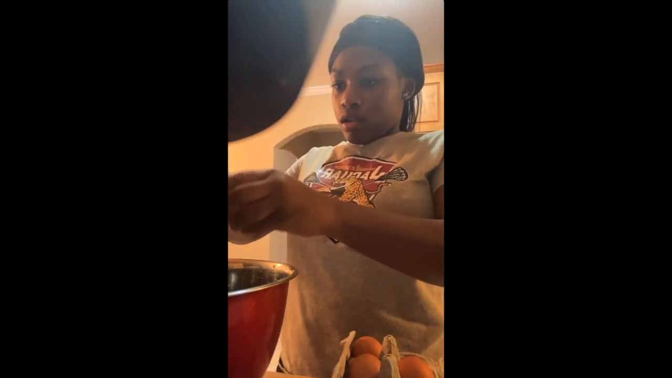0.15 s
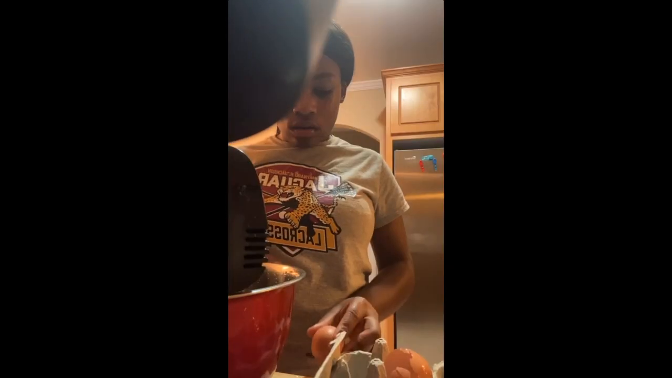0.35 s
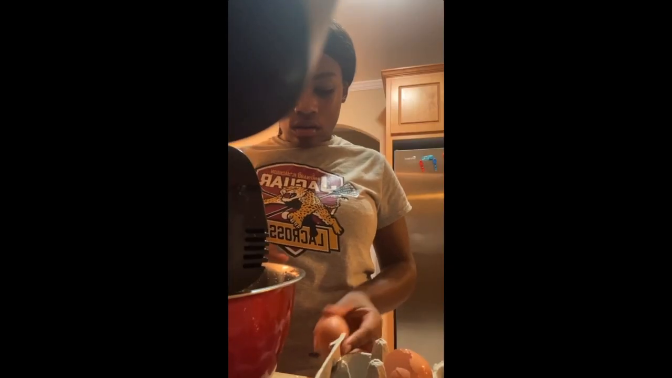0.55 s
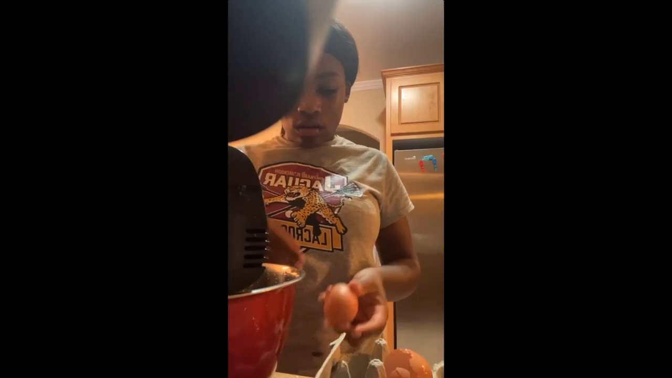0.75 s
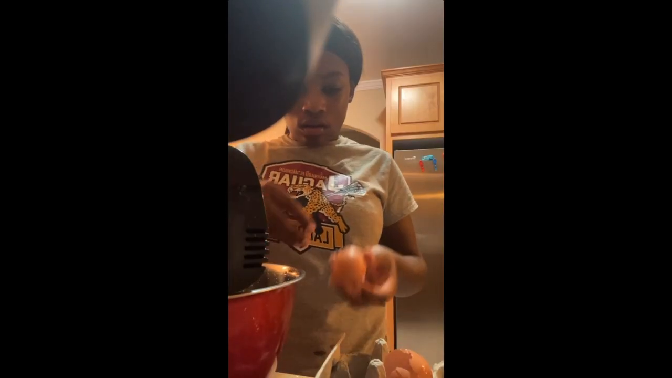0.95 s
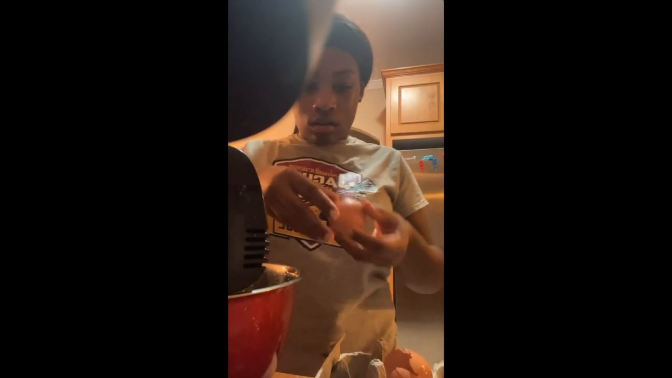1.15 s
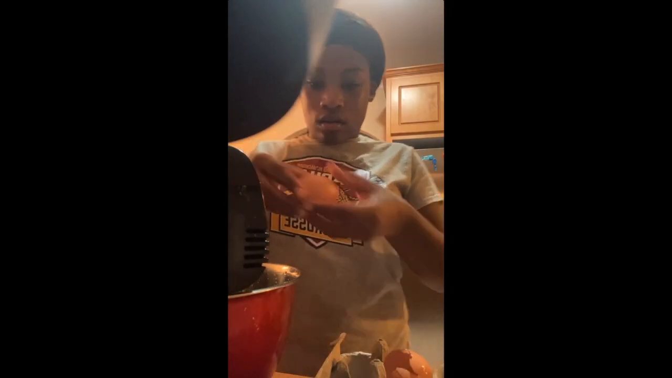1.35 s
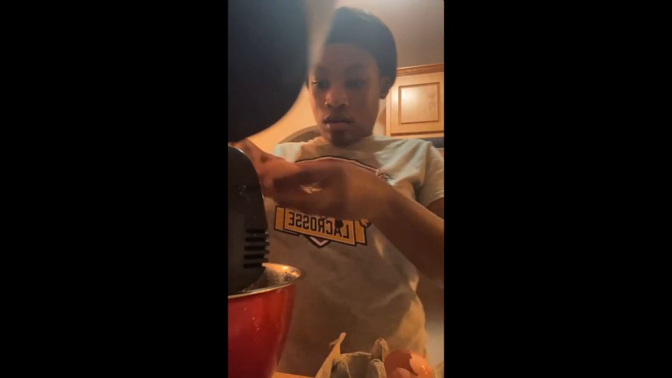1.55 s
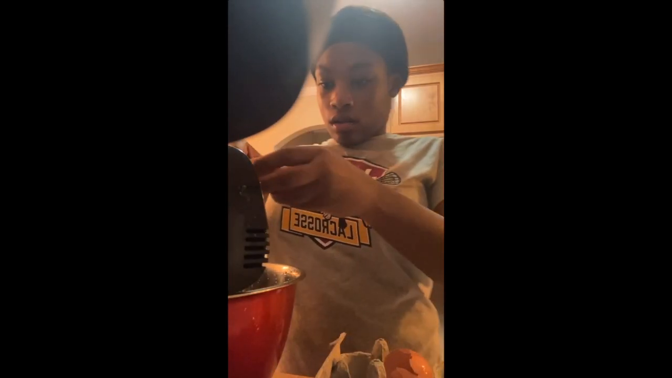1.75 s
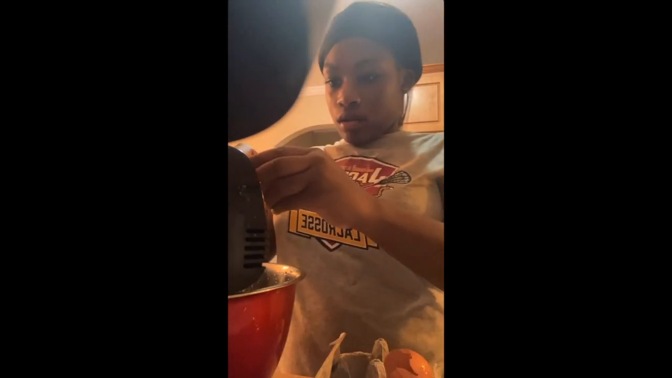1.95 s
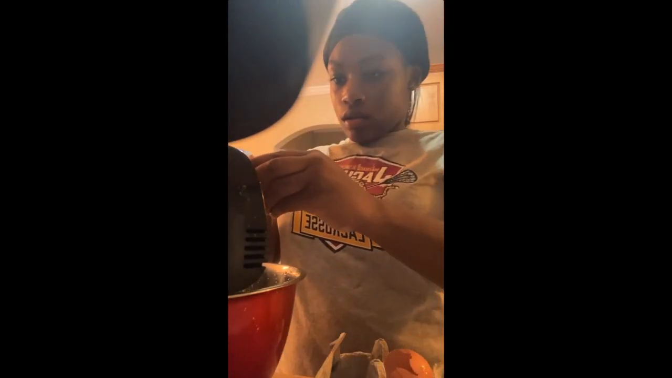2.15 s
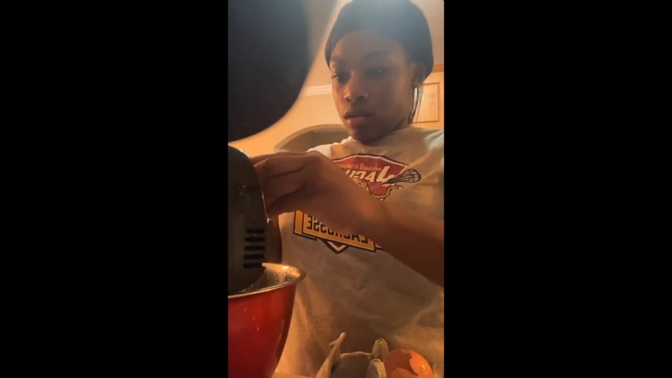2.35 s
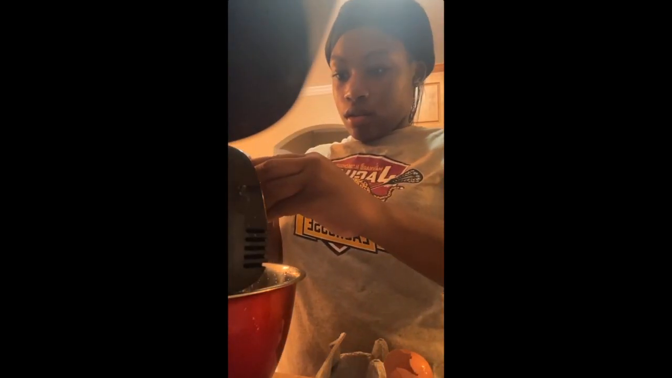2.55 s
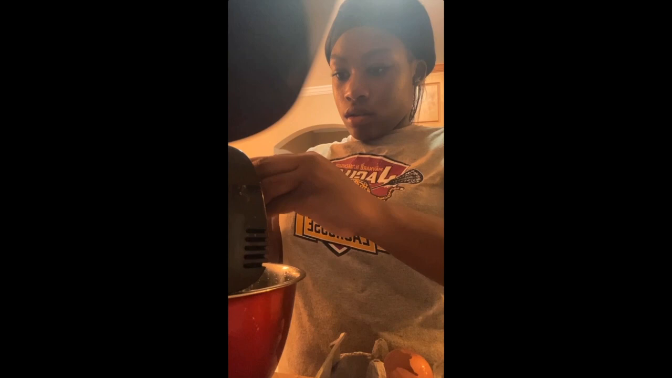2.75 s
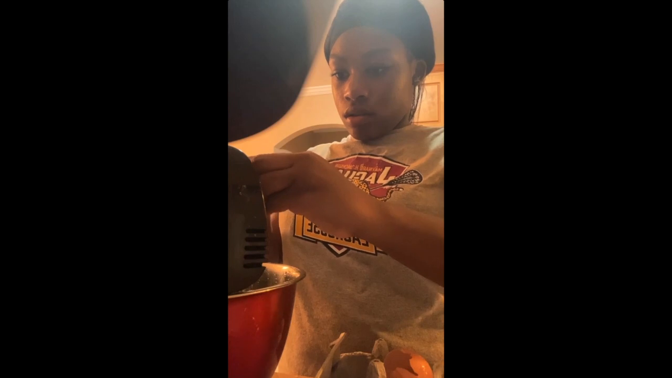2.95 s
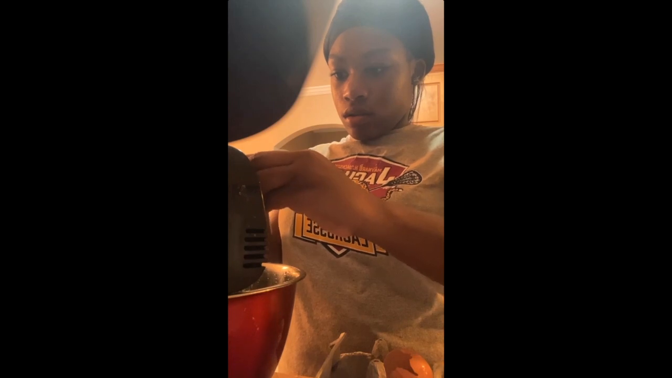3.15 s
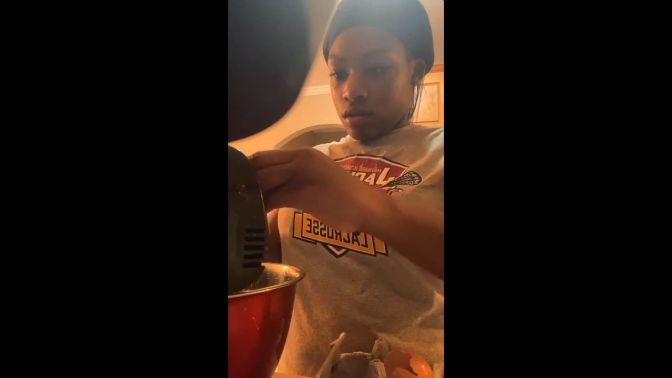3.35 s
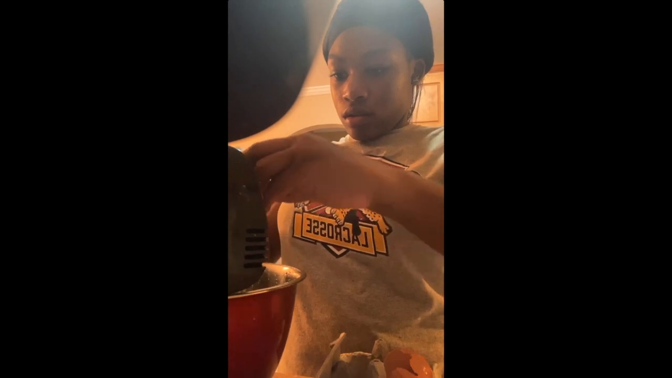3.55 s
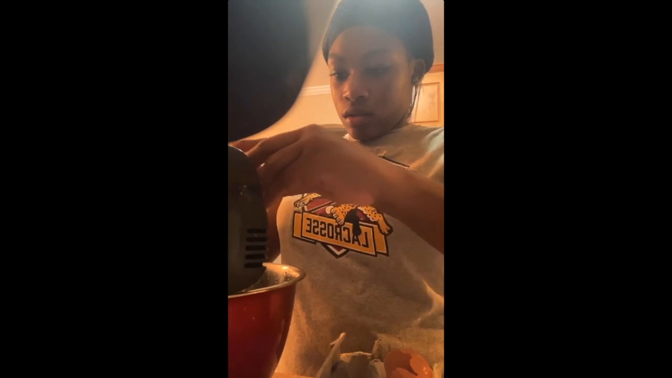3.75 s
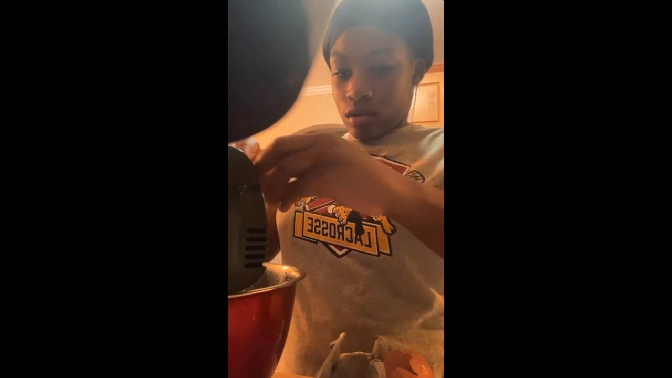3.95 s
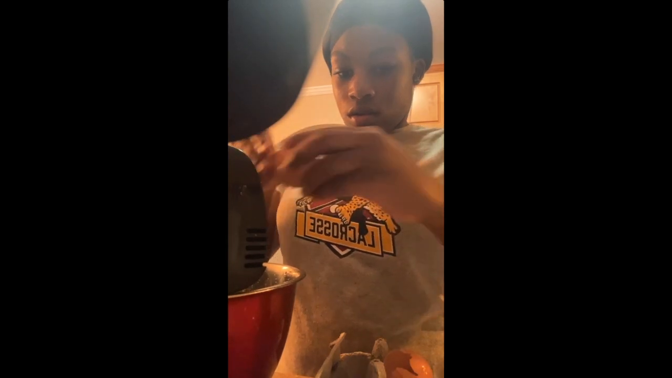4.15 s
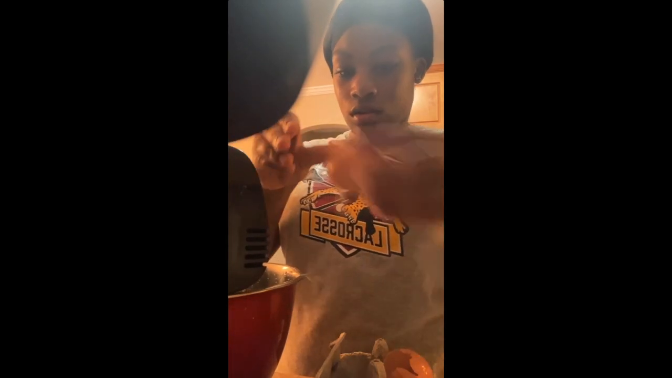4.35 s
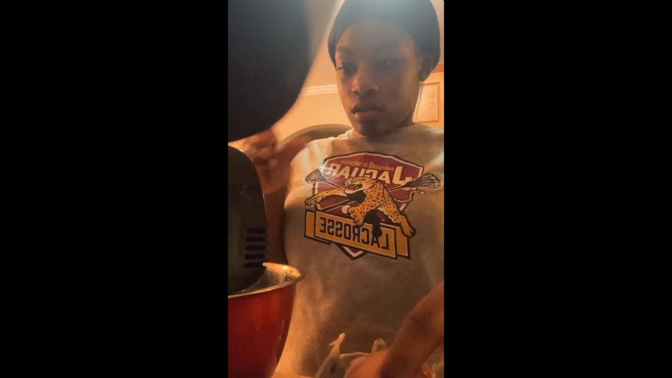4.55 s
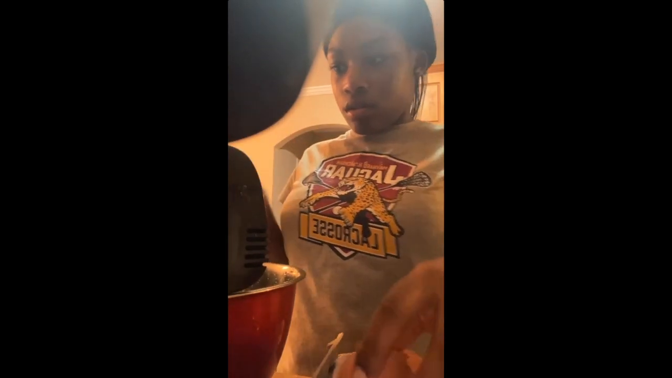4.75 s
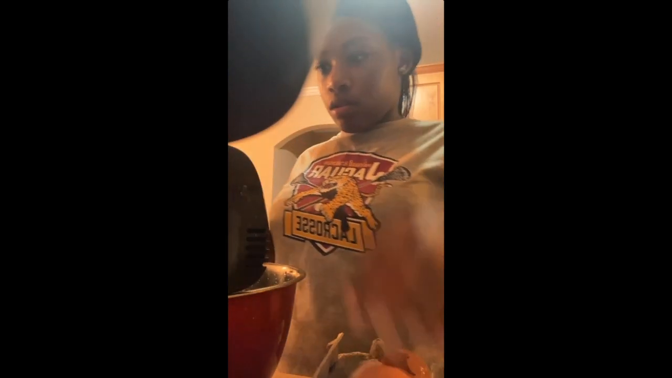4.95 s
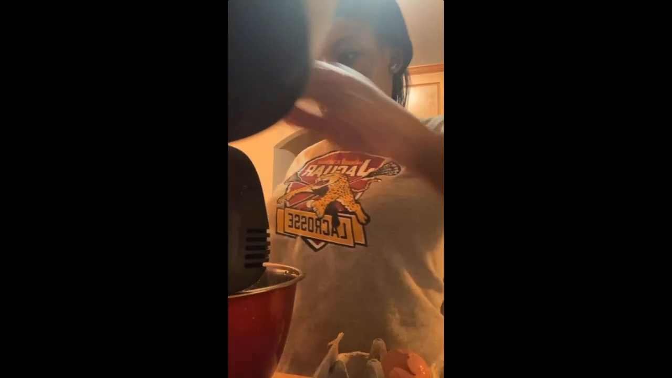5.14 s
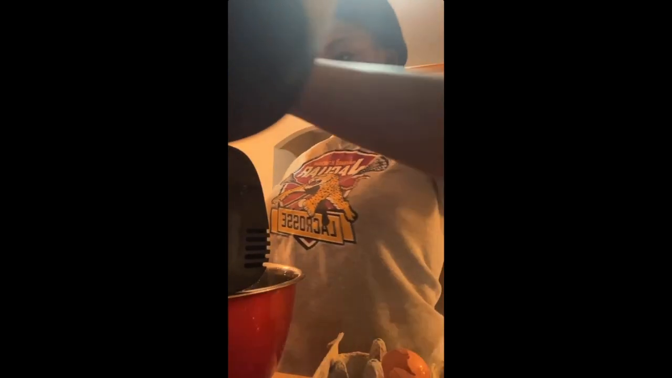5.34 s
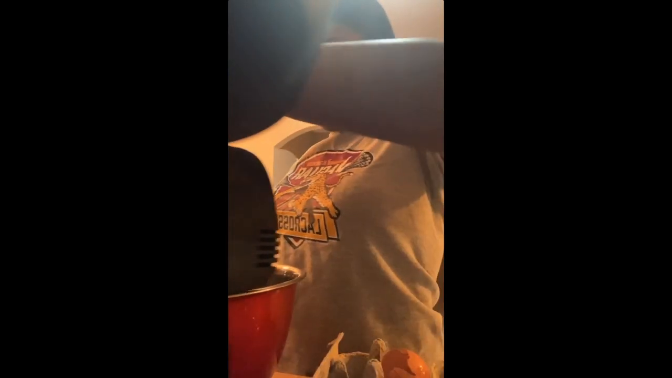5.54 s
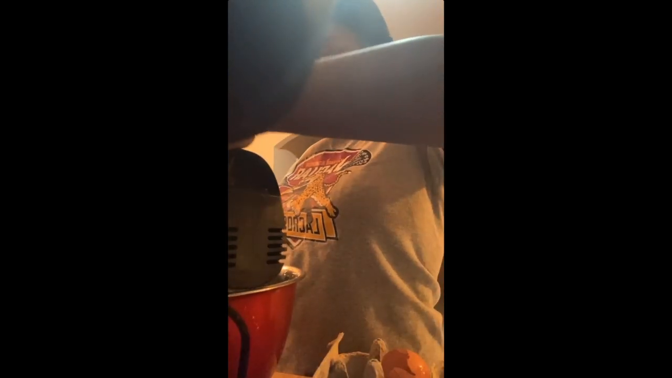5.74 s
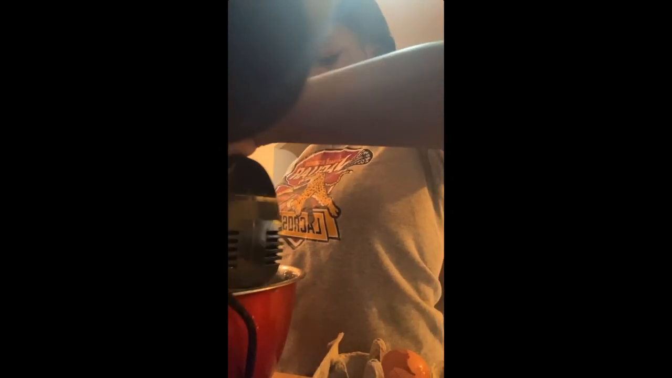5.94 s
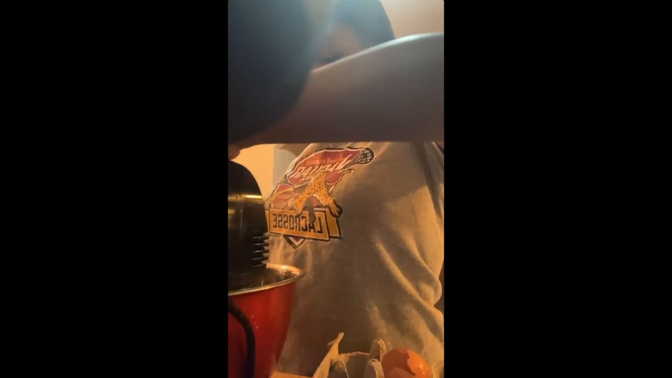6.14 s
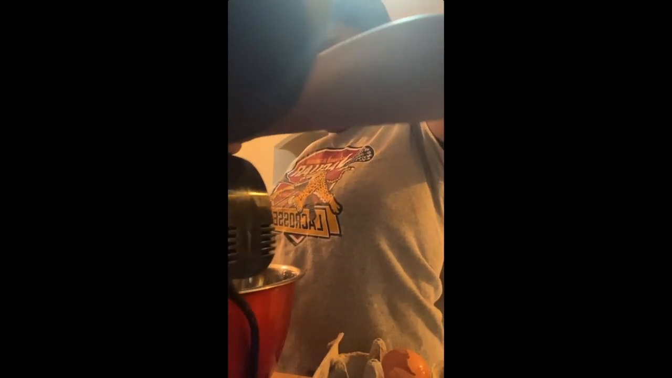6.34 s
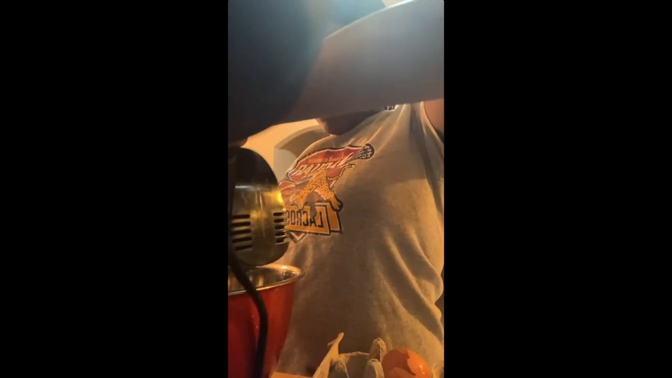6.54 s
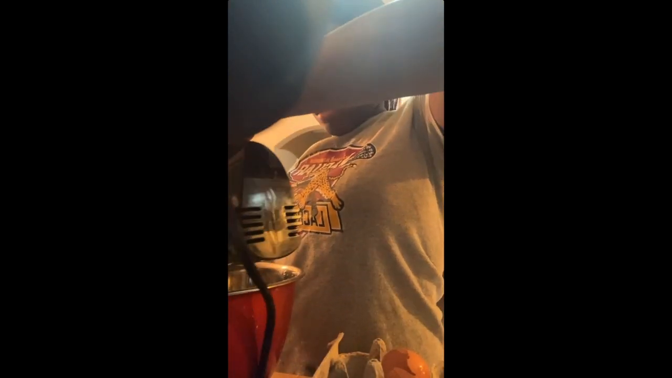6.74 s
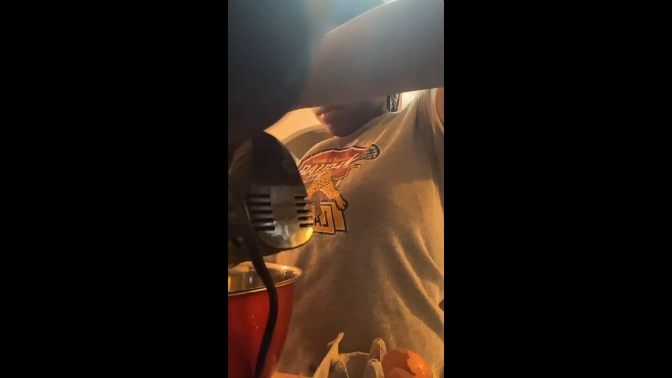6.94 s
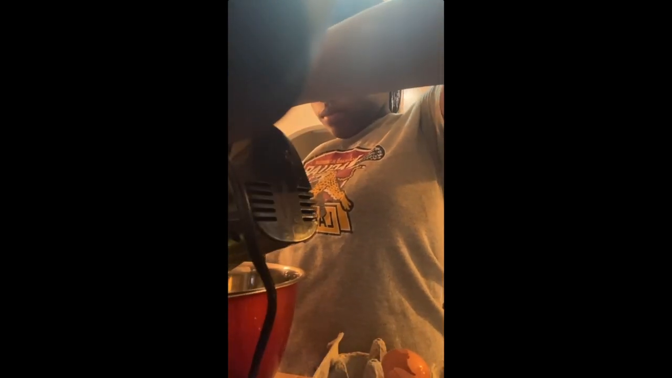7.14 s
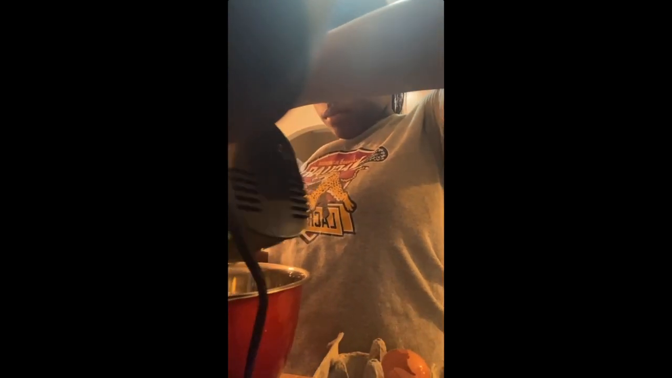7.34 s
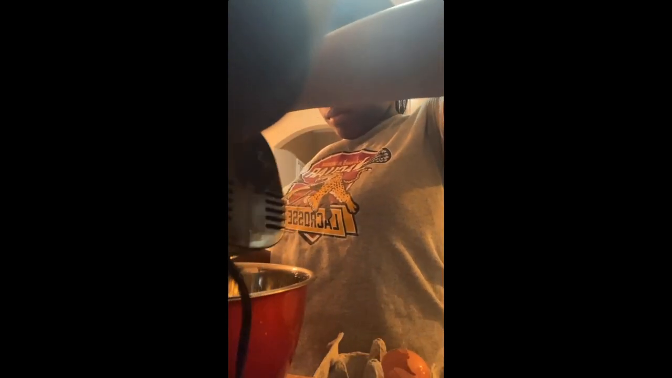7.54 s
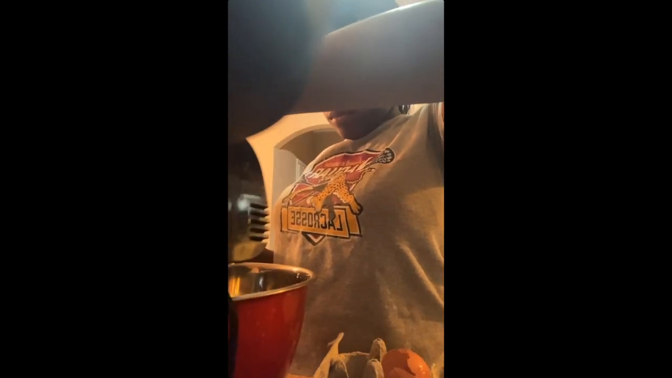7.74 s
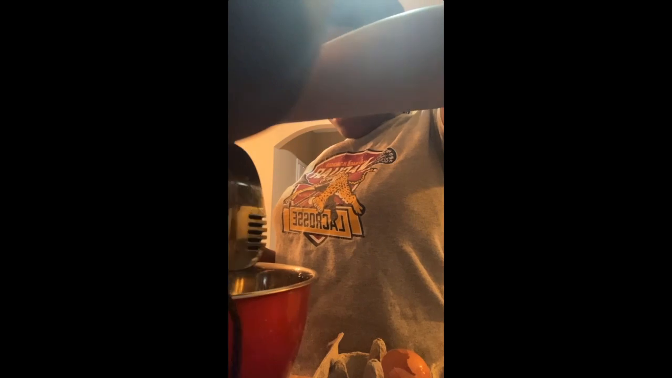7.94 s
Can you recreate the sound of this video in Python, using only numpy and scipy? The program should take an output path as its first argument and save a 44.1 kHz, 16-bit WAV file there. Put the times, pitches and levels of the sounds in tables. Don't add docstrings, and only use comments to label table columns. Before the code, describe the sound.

First, sparse delicate sounds near the microphone: fingers on shell and carton, brittle cracking, a small bowl ring, then a hard tap on something solid and low counter bumps. A fridge hums faintly beneath. Then an electric mixer switches on, its whine climbing quickly to a steady high whir, with airy hiss, churning batter and quick uneven hollow knocks of blades on the bowl in a short-echo kitchen.

```python
import sys
import numpy as np
from scipy import signal
from scipy.fft import rfft, irfft, next_fast_len
from scipy.io import wavfile
from scipy.ndimage import uniform_filter1d, minimum_filter1d

SR = 44100
rng = np.random.default_rng(int(sys.argv[2]) if len(sys.argv) > 2 else 0)


def waveform_to_disk(signal):
    frames = np.transpose(np.atleast_2d(signal))
    scaled = np.clip(frames, -1, 1) * 32767
    samples = np.round(scaled).astype(np.int16)
    wavfile.write(sys.argv[1], SR, samples)


def ratio_of_db(decibels):
    return 10 ** (np.asarray(decibels, float) / 20)


N = 352359
TIME_S = np.arange(N) / SR
TOP_SPEED = 357.6

# t/s, angle/turns
BEATER_TURNS = [
    (6.0207, 0),
    (6.2695, 4),
    (6.5066, 8),
    (6.6217, 10),
    (7.08, 18),
    (7.1923, 20),
    (7.3003, 22),
    (7.4104, 24),
    (7.9725, 34),
]
# f/Hz, density/dB per Hz
HISS_SPECTRUM = [(710, -44), (1200, 4.5), (1310, 3.5), (1810, 6), (2710, -14.5), (2980, -8.5), (3250, -5.5),
                 (4080, 0), (5180, -11), (5530, -11.5), (7100, -15), (9210, -16.5), (11700, -31),
                 (13000, -43), (16000, -41)]
# width/Hz, lift or dip/dB
HOUSING_PEAKS = [(150, 3.5), (246, 0), (150, -3.5), (180, 6), (120, -6), (160, 3.5), (180, 4.5), (90, 1.5),
                 (150, -9), (250, 5), (250, -3), (200, 7), (150, 7), (200, 0.5), (130, 7.5), (280, 7.5),
                 (150, 3.5), (250, 4.5)]
# f/Hz, density/dB per Hz
KNOCK_SPECTRUM = [(35, -59), (60, -43), (130, 2), (212, -6.5), (290, 0), (356, -6), (466, 5), (619, -1.5),
                  (876, 4), (1870, -5.5), (2600, -23), (3380, -112), (5720, -120)]


def in_time(rows):
    s, *columns = np.transpose(rows)
    return [np.interp(TIME_S, s, c) for c in columns]


def rms_one(x):
    return x / np.sqrt(np.mean(x ** 2) + 1e-20)


def comb_db(hz, peaks):
    centres_hz = [1760, 2420, 2720, 3010, 3280, 3630, 4010, 4210, 4390, 4720, 5200, 5570, 5980, 6400, 6740,
                  7640, 8500, 9150]
    return sum(level_db / (1 + (2 * (hz - centre_hz) / width_hz) ** 2)
               for centre_hz, (width_hz, level_db) in zip(centres_hz, peaks))


def noise(spectrum, peaks=(), low_hz=0, high_hz=SR):
    size = next_fast_len(N)
    hz = np.arange(size // 2 + 1) * SR / size + 1
    point_hz, point_db = np.transpose(spectrum)
    gain = ratio_of_db(np.interp(np.log(hz), np.log(point_hz), point_db) + comb_db(hz, peaks))
    gain = gain / (1 + (low_hz / hz) ** 6) / (1 + (hz / high_hz) ** 6)
    return rms_one(irfft(gain * rfft(rng.standard_normal(size)), size)[:N])


def drift(rate):
    r = np.exp(-80 * np.pi * rate / SR)
    slow = signal.lfilter([1], [1, -2 * r, r * r], rng.standard_normal(N // 40 + 2002))[2000:]
    return np.interp(np.arange(N) / 40, np.arange(len(slow)), rms_one(slow))


def ring(clicks, hz, t60_s):
    r, w = ratio_of_db(-60 / (t60_s * SR)), 2 * np.pi * hz / SR
    return signal.lfilter([0, np.sin(w)], [1, -2 * r * np.cos(w), r * r], clicks + 1e-18)


def blow(s, t60_s, rise_s):
    t = np.arange(int(.6 * SR)) / SR
    start = round(s * SR)
    fade = (1 - np.exp(-t / rise_s)) * ratio_of_db(-60 * t / max(t60_s, .005))
    return slice(start, start + len(t)), t, fade


def knocks():
    # f/Hz, level/dB, t60/s
    bowl_modes = [(365, 0, .07), (415, 0, .06), (465, -2, .05), (522, 0, .06), (575, -1, .05),
                  (640, -1, .04), (760, 0, .03)]
    # f/Hz, level/dB, t60/s
    rim_modes = [(993, 4.5, 0.03), (1115, -13, 0.13), (1780, -17, 0.0086)]
    # t/s, favoured ring f/Hz, rim level/dB
    contact = [(6.05, 525, -28), (6.34, 546, -37), (6.62, 500, -20), (6.73, 403, -19.5), (6.85, 408, -27.5),
               (6.91, 440, -31), (7.13, 408, -29.5), (7.35, 403, -24), (7.41, 520, -31), (7.46, 428, -31),
               (7.75, 373, -44), (7.8, 477, -45), (7.86, 428, -37), (7.99, 472, -31)]
    force_rows = [(-12.0, -16.5, -7, 3), (1, -8, -1.5, -5), (2, -24, -10, -0.5), (-3, -4.5, -10, -3),
                  (-5, -26, -2, -6.5), (-1, -22, -11.5, -5), (-4.5, -14, -6, -5), (-4, -24, -8.5, -11),
                  (-3, -19.5, -7, -14), (-3, -10, -24, -27), (-2, -15, -19, -24), (-6, -20, -10, -17),
                  (-6, -12, -13, -26), (-4.5, -11, -17, -17), (-3, -23, -10, -6.5), (-3.5, -12, -6.5, -7.5),
                  (-4.5, -6.5, -7.5, -4), (-7, -19, -5, -10.5), (-5.5, -11, -6, -4.5), (-5, -17, -8, -8.5),
                  (-6, -21, -13.5, -23), (-7.5, -16, -6, -14), (-3, -15, -7, -9), (-4, -11, -12, -6),
                  (-4, -8, -18, -7), (2, -14, -13.5, -9), (-1.5, -8.5, -13, -13), (-1, -12, -31, -5),
                  (-7, -5, -19, -12), (-0.5, -6.5, -22, -13), (-1, -7.5, -6.5, -13), (-8, -4.5, -12, -18),
                  (-8, -5.5, -12, -14), (-7.5, -5, -12, -16)]
    late_ms = [(-4.4, 3.8, 7.1, 3.6), (-0.8, -5.7, 0.3, 0.7), (-1.4, 1.8, 0.1, 1.6), (-1.0, 6.3, 0.6, 1.8),
               (-1.6, -4.5, 0.5, 2.2), (-0.2, -3.0, 1.9, 3.9), (0.2, 3.4, 1.0, 2.7), (1.0, -4.7, 0.3, 2.6),
               (-0.8, -3.8, 0.1, 2.3), (-0.7, -5.4, 1.7, -1.8), (-0.7, -5.7, -0.7, 7.5),
               (-0.6, 2.8, 1.0, 1.4), (-1.2, -5.7, 5.5, 2.4), (-0.9, 7.5, -0.3, 1.9),
               (-1.2, -5.7, 1.0, 0.8), (-1.8, -5.7, -0.3, 1.4), (-1.6, -5.7, -0.6, 1.2),
               (-1.8, -5.7, -0.6, 1.6), (-0.6, 6.3, 0.5, 2.7), (0.7, 6.5, 3.4, 4.8),
               (1.7, -5.3, -0.7, -0.6), (-0.6, -3.8, -0.0, 2.3), (-1.7, 5.6, 1.7, 7.5),
               (-0.9, 6.4, 0.4, 1.4), (-1.3, 5.1, 5.8, 0.0), (-1.7, -5.7, -4.6, 4.8),
               (-2.4, -0.6, -1.0, -4.3), (-2.2, -0.9, 0.2, 1.9), (-1.9, -1.2, 1.1, 7.5),
               (-1.6, -1.7, 3.2, -2.1), (-0.7, -1.4, 0.0, -5.7), (0.1, -1.2, 0.9, 5.4),
               (2.0, -1.6, -0.7, 2.4), (0.4, -1.5, 6.3, -2.1)]
    other_blades_hz, touch_gap_s, bounce_s = 520, 0.001885, .0065
    slap_db, slap_hz, slap_t60_s = -4.5, 703, 0.029

    s, turns = np.transpose(BEATER_TURNS)
    quarter = np.arange(2, 4 * turns[-1], dtype=int)
    when_s = np.interp(quarter / 4, turns, s) - .0027 + np.ravel(late_ms)[quarter] / 1000
    force_db = np.ravel(force_rows)[quarter]
    at = (when_s * SR).astype(int)
    favoured_hz, rim_db = (c[at] for c in in_time(contact))
    favoured_hz[quarter % 4 > 0] = other_blades_hz

    shares = np.array([ratio_of_db(db - 100 * np.log2(hz / favoured_hz) ** 2 + rng.normal(0, 1.8, len(at)))
                       for hz, db, _ in bowl_modes])
    heights = [*(ratio_of_db(1.47 * force_db + 5.5) * shares / shares.sum(0))]
    bent_db = np.where(quarter % 4 == 3, 9.0, 1.5)
    heights += [ratio_of_db(rim_db + db + bent_db) for _, db, _ in rim_modes]

    out = np.zeros(N)
    for (hz, _, t60_s), height in zip(bowl_modes + rim_modes, heights):
        clicks = np.zeros(N)
        clicks[at] = height
        clicks[at + round(bounce_s * SR)] = height * rng.normal(0, .2, len(at))
        out -= ring(clicks, hz, t60_s)
    out = ratio_of_db(-2.5) * (out + ratio_of_db(-2.5) * np.roll(out, round(touch_gap_s * SR)))
    slaps = np.zeros(N)
    slaps[at] = ratio_of_db(1.3 * force_db + slap_db)
    out = out - ring(slaps, slap_hz, slap_t60_s)
    return signal.sosfilt(signal.butter(2, [290, 1200], "band", fs=SR, output="sos"), out)


def motor_speed():
    switch_s, quick_share, quick_s, quick_shape, slow_s = 5.6223, .6385, .147, 1.45, .4068
    swing_turns_per_s, eases_s, period_s = 6.56, 6.6035, 2.05
    on_s = np.maximum(TIME_S - switch_s, 0)
    short = quick_share * np.exp(-(on_s / quick_s) ** quick_shape)
    short = short + (1 - quick_share) * np.exp(-on_s / slow_s)
    swing = swing_turns_per_s * np.cos(2 * np.pi * (TIME_S - eases_s) / period_s)
    return np.maximum(TOP_SPEED * (1 - short) + swing, 1)


def vent_hiss(speed, shaft, turn, slosh):
    # t/s, level at full speed/dB
    air = [(5.66, -23), (5.86, -24), (6.04, -19.5), (6.2, -27), (6.75, -24.5), (7.1, -25.5), (7.3, -24),
           (7.42, -22.5), (7.52, -26.5), (7.75, -27), (7.99, -29.5)]
    air_db = in_time(air)[0] + 20 * 2.15 * np.log10(speed / TOP_SPEED)
    throb_db = np.cos(shaft) + np.cos(4 * turn) + 0.34 * np.cos(turn) + 1.03 * drift(38)
    throb = ratio_of_db(throb_db) + 0.28 * slosh
    hiss = ratio_of_db(air_db) * throb * noise(HISS_SPECTRUM, HOUSING_PEAKS, 1740)
    hiss += ratio_of_db(-45) * noise(HISS_SPECTRUM, (), 7300)
    slow = np.clip((350 - speed) / 90, 0, 1)
    hiss += ratio_of_db(-54) * slow * noise([(11000, -17), (12500, -2), (15500, -8)])
    hiss += ratio_of_db(-17) * slosh * ratio_of_db(3.4 * drift(230)) * noise(HISS_SPECTRUM, (), 630, 2600)
    return hiss


def motor_whine(speed, shaft):
    # multiple of shaft, level/dB
    fan_lines = [(4, -12), (6, -12), (8, -8), (12, 4), (16, -6), (18, -4), (20, -4), (24, 2), (30, 1),
                 (36, 1), (42, 2), (48, 3), (54, 2)]
    strain_db = -49 + 15 * np.clip((345 - speed) / 70, 0, 1)
    strain_db = strain_db + 20 * np.log10(np.minimum(speed / 250, 1))
    whine = 0
    for k, db in fan_lines:
        hz = k * speed
        vent = 1 + 4 * (k == 12) / (1 + ((hz - 3170) / 150) ** 2)
        colour_db = np.interp(hz, *np.transpose(HISS_SPECTRUM)) + 1.5 * comb_db(hz, HOUSING_PEAKS)
        level = ratio_of_db(db + strain_db + colour_db + 4.5 * drift(40)) * vent
        whine += level * np.sin(k * shaft + (.45 + k / 70) * drift(80))
    bars = ratio_of_db(-57 + 4 * np.clip((345 - speed) / 30, 0, 1) + 2.5 * drift(30)) * speed / 350
    return whine + bars * np.sin(36 * shaft + .45 * drift(80))


def batter_churn(slosh):
    # f/Hz, density/dB per Hz
    churn_spectrum = [(24, -47), (40, -30), (80, -21), (283, -19.5), (389, -14.5), (439, -25), (613, -11),
                      (781, -22), (1500, -29), (1950, -63), (3300, -120)]
    return ratio_of_db(-23 + 1.6 * drift(22)) * (1 + 5.5 * slosh) * noise(churn_spectrum, (), 0, 1800)


def shaft_hum(speed, shaft):
    shiver = 1 / (1 + ((speed - 256) / 38) ** 2)
    return ratio_of_db(-19 + 2.5 * drift(15)) * shiver * np.sin(shaft)


def counter_shake(turn):
    shake_lines = [(4, 6), (6, 7), (10, 5.5), (14, 0.5), (2, -50)]
    level_db = -23.5 + 3.5 * np.exp(-np.abs(TIME_S - 6.09) / 0.042)
    level_db = level_db - 10.5 * np.clip((TIME_S - 7.23) / 0.016, 0, 1)
    shake = sum(ratio_of_db(db + level_db - 7 + 2 * drift(6.5)) * np.sin(k * turn + 0.35 * drift(2.2))
                for k, db in shake_lines)
    lurch = 1 + 0.22 * np.cos(turn - 1.5)
    dipped = np.clip((TIME_S - 6.04) / 0.057, 0, 1)
    return dipped * lurch * shake


def mixer(bowl):
    speed = motor_speed()
    shaft = 2 * np.pi * np.cumsum(speed) / SR
    turn = 2 * np.pi * in_time(BEATER_TURNS)[0]
    slosh = signal.lfilter([.008], [1, -.992], np.abs(bowl))
    started = np.clip((TIME_S - 5.648) / 0.015, 0, 1)
    air = vent_hiss(speed, shaft, turn, slosh) + motor_whine(speed, shaft)
    return started * (air + batter_churn(slosh) + shaft_hum(speed, shaft) + counter_shake(turn))


def shells():
    # t/s, peak level/dB, ring f/Hz, sharp edge level/dB
    scuffs = [(0.015, -39.5, 1396, 5), (0.066, -40, 2120, 1), (0.2533, -32.5, 1160, -21),
              (.305, -37, 980, -27), (0.349, -59, 1120, -25), (0.616, -38.5, 3800, -5.5),
              (1.298, -37, 4020, 8), (1.328, -37, 3880, -3), (1.366, -42.5, 1220, -5),
              (1.802, -36.5, 1380, -2), (1.865, -41, 4600, 4.5), (2.308, -26.5, 1490, -2.5),
              (3.0654, -26.5, 1934, 0.5), (3.344, -42, 1694, 6), (3.814, -43, 1410, 4),
              (4.977, -32, 1234, -28), (5.0548, -25.5, 4300, -6), (5.094, -34, 4100, -14)]
    # t/s, peak level/dB, ring f/Hz, sharp edge level/dB
    snaps = [(1.075, -56, 6000, -6), (1.172, -53, 7500, -1), (1.6297, -36, 1950, 1.5),
             (1.807, -34, 1230, -7), (1.867, -36, 7200, 4), (1.984, -40.5, 1370, -27),
             (2.0925, -45, 1850, 1), (2.141, -50, 1380, -12), (2.53, -41, 1550, -12),
             (2.3486, -23, 1630, -6), (3.035, -31, 1460, -8), (3.05, -22.5, 1800, -4),
             (3.29, -30.5, 1450, -8), (3.3215, -31, 3980, -7), (3.3358, -16.5, 1480, -18),
             (3.356, -23.5, 1790, -3), (3.4564, -48, 1840, -2), (3.586, -34, 1960, -8),
             (3.825, -25, 1420, -15), (3.852, -31, 1410, -19), (3.9522, -38, 1250, -13),
             (3.9737, -35, 1210, -7), (4.403, -41.5, 5000, 4), (4.765, -43, 1210, -22),
             (4.929, -44, 900, -19), (4.951, -26.5, 900, -17), (3.5094, -25, 4100, 3.5),
             (3.63, -22.5, 1870, -13), (3.662, -32, 1990, -6), (3.702, -14.5, 5700, -10),
             (3.704, -53, 2000, -18), (3.7293, -21, 1970, -8), (3.7567, -33, 1920, -30),
             (3.796, -31.5, 5800, -7), (3.8911, -21.5, 1400, 4), (3.926, -25.5, 1260, -2),
             (4.412, -35, 3560, -4), (4.418, -16.5, 1290, -18), (4.428, -15.5, 1910, -14),
             (4.683, -37.5, 4800, -8), (4.814, -29, 1520, -14), (5.102, -18, 4100, -3),
             (5.66, -36, 11500, 6), (6.111, -16, 7700, -5)]
    # t/s, peak level/dB, ring f/Hz, sharp edge level/dB, body level/dB
    taps = [(2.5116, -40, 1430, -1, -10), (2.629, -38.5, 1810, 3.5, 3), (2.6783, -30, 1550, -5.5, 0.5),
            (3.475, -31, 3950, 8.5, -7.5), (3.571, -46, 1370, 0, 6), (3.605, -16.5, 3760, -4, -16.5),
            (4.508, -12, 1355, -12, -2.5), (4.512, -9, 1070, -10, -15), (4.5158, -5.5, 1394, -10, -25),
            (4.535, -13, 1450, -13, -15), (4.5485, -9.5, 1490, -4.5, -12.5), (4.5708, -12, 1984, -1, -9.5),
            (4.794, -24, 1484, 1, 0.5), (4.799, -24, 5500, -7, -19), (4.877, -29.5, 1590, -4, 3),
            (5.02, -28, 3870, 2, 6.5), (5.026, -22.5, 5500, -15, -3.5), (5.5454, -35, 1290, -35, 8),
            (5.649, -16, 985, -1, -11), (5.655, -13, 1455, -8.5, -17), (5.691, -22.5, 1740, -3, 8)]
    cracks = [(*row, -11.5, 0.15) for row in scuffs]
    cracks += [(*row, -38, 0.03) for row in snaps]
    cracks += [(*row, 0.035) for row in taps]

    bright = noise(HISS_SPECTRUM, HOUSING_PEAKS, 1500, 7000)
    sharp = noise(HISS_SPECTRUM, HOUSING_PEAKS, 7000)
    dull = noise(KNOCK_SPECTRUM, (), 200, 1500)
    crumbs, grit = ratio_of_db(9.5 * drift(106)), ratio_of_db(2 * drift(200))
    wobbles = drift(150), drift(390)
    out = np.zeros(N)
    for s, peak_db, ring_hz, sharp_db, body_db, t60_s in cracks:
        at, t, fade = blow(s, t60_s, 0.019 * t60_s)
        tail = ratio_of_db(-9) * grit[at] * blow(s, 1.5 * t60_s, 0.0012)[2]
        wobble = wobbles[int(ring_hz > 3000)][at]
        clear = t60_s < .08
        tone = (.8 * clear + .8 * wobble) * np.sin(2 * np.pi * ring_hz * t)
        shell = 0.65 * (fade + .4 * tail) * bright[at] + (fade + tail) * tone
        edge = ratio_of_db(sharp_db - 13) * (fade + 0.7 * tail) * sharp[at]
        crumble = crumbs[at] ** min(.55, 0.046 / t60_s)
        out[at] += crumble * ratio_of_db(peak_db) * (ratio_of_db(-7) * shell + edge)
        out[at] += ratio_of_db(peak_db + body_db + 2) * blow(s, 1.77 * t60_s, 0.00054)[2] * dull[at]
    return out


def creaks():
    # t/s, level/dB, f/Hz
    shell_creaks = [
        [(3.795, -53, 1400), (3.828, -21, 1400), (3.87, -54, 1380), (3.915, -49, 1350), (3.94, -32, 1303),
         (3.99, -31.5, 1250)],
        [(4.93, -36, 797), (4.992, -29, 795), (5.0, -53, 797)],
    ]
    # t/s, level/dB, f/Hz
    squeaks = [
        [(1.1, -61, 1860), (1.35, -57, 1960), (1.64, -55.5, 1945), (1.68, -68, 1900)],
        [(.45, -70, 3500), (.55, -72, 3490), (.61, -65, 3480)],
        [(.44, -61, 3920), (.52, -61, 3850), (.58, -72, 3830)],
        [(2.08, -51, 1496), (2.322, -56, 1687), (2.6, -46, 1614)],
    ]
    out = 0
    for rows in shell_creaks + squeaks:
        level_db, hz = in_time(rows)
        on = uniform_filter1d(1. * (TIME_S > rows[0][0]) * (TIME_S < rows[-1][0]), size=400)
        if rows[0][2] < 3000:
            slips = drift(170) * ratio_of_db(3.5 * drift(40))
        else:
            slips = ratio_of_db(3 * drift(40))
        out = out + on * ratio_of_db(level_db - 1) * slips * np.sin(2 * np.pi * np.cumsum(hz) / SR)
    return out


def dings():
    # t/s, level/dB, f/Hz, t60/s
    ding_events = [(4.016, -12, 487, 0.098), (7.982, -2, 473, .04), (4.427, -15, 1100, 0.018),
                   (4.511, -20, 1050, 0.056), (4.794, -25, 536, 0.045), (4.878, -24, 1070, .03),
                   (5.0205, -1.5, 553, 0.024), (5.094, -16.5, 1022, .03), (5.103, -15, 970, 0.022),
                   (5.6615, -5.5, 510, 0.043), (5.679, -8, 533, 0.061), (5.696, -18, 700, 0.026),
                   (6.546, -6.5, 996, 0.055), (6.604, -23, 1000, .05), (6.66, -14, 1020, .04),
                   (7.45, -5.5, 1047, 0.063)]
    out = np.zeros(N)
    for s, level_db, hz, t60_s in ding_events:
        at, t, fade = blow(s, t60_s, .0016)
        out[at] += (ratio_of_db(level_db) * fade * np.sin(2 * np.pi * hz * t))[:N - at.start]
    return out


def bumps():
    # t/s, level/dB, f/Hz, t60/s
    bump_events = [(2.691, -33, 75.5, 0.53), (3.5, -36, 66.6, 0.45), (4.05, -28, 140, .6),
                   (4.515, -22, 70, 0.15), (4.518, -16, 163, 0.097), (4.8, -11, 133, 0.042),
                   (4.801, -24, 320, .05), (5.025, -30, 52, 0.36), (5.03, -21.5, 90, 0.1),
                   (5.031, -24, 170, .14), (5.268, -15.5, 162.6, 0.09), (5.47, -20, 122.6, 0.38),
                   (5.521, -22, 173, 0.19), (5.66, -15, 280, .17), (5.7, -12.5, 71, 0.23)]
    out = np.zeros(N)
    for s, level_db, hz, t60_s in bump_events:
        at, t, fade = blow(s, t60_s, .012)
        out[at] += ratio_of_db(level_db) * fade * np.sin(2 * np.pi * hz * t)
    return out


def thuds():
    # f/Hz, density/dB per Hz
    soft_spectrum = [(29, -60), (50, -29), (71, 0), (135, 4), (218, -17), (422, 6.5), (670, -5), (778, 0),
                     (1060, -15.5), (1900, -21.5), (2600, -47), (3380, -84), (5720, -120)]
    # t/s, level/dB, brightness/dB
    soft_blows = [
        (2.634, -32, -9.5),
        (2.697, -19, -32),
        (2.89, -39, -41),
        (3.6, -41.5, -30),
        (5.46, -33.5, -39),
        (5.66, -21.5, -9),
    ]
    # t/s, level/dB, brightness/dB
    hard_blows = [
        (4.005, -28.5, -24),
        (4.011, -20.5, -3.5),
        (4.021, -20, -41),
    ]
    high, out = noise(HISS_SPECTRUM, HOUSING_PEAKS, 720, 7500), np.zeros(N)
    for blows, spectrum in ((soft_blows, soft_spectrum), (hard_blows, KNOCK_SPECTRUM)):
        low = noise(spectrum)
        for s, level_db, bright_db in blows:
            at, _, fade = blow(s, 0.56, 0.0063)
            treble = ratio_of_db(bright_db) * blow(s, 0.37, 0.00035)[2] * high[at]
            direct = ratio_of_db(5.5) * blow(s, 0.038, 0.0032)[2] * low[at]
            out[at] += ratio_of_db(level_db) * (fade * low[at] + treble + direct)
    return out


def kitchen(x):
    t60_s, wall_cut_hz = .45, 9000
    size = next_fast_len(N + SR)
    w = 2 * np.pi * np.arange(size // 2 + 1) / size
    t60_s = t60_s / (1 + w * SR / 2 / np.pi / wall_cut_hz)
    answer = 0
    for k, lag in enumerate(rng.uniform(.011, .04, 10) * SR):
        loop = ratio_of_db(-60 * lag / SR / t60_s) * np.exp(-1j * w * round(lag))
        answer = answer + (-1) ** k * loop / (1 - loop)
    return irfft(answer * rfft(x, size), size)[:N] / 3


def background():
    # t/s, level/dB
    hands = [(0, -57.5), (.11, -68), (.31, -56.5), (.77, -69), (1.1, -68.5), (1.46, -60.5), (1.66, -66.5),
             (2.54, -62), (2.81, -70.5), (3.39, -60), (3.69, -61.5), (4.07, -52), (4.27, -65.5),
             (4.67, -59.5), (4.98, -58), (5.15, -64), (5.32, -65), (5.64, -56.5)]
    # t/s, level/dB
    hum_swells = [(0, -50), (.5, -45.5), (1.2, -47.5), (1.8, -48.5), (1.95, -53), (2.1, -46), (2.6, -47),
                  (3.2, -45), (3.35, -50), (4.2, -47.5), (5.6, -45)]
    # f/Hz, density/dB per Hz
    floor_spectrum = [(15, -54), (25, -12.5), (91, -4), (122, -22), (146, -7), (293, -15), (334, -11.5),
                      (598, -19.5), (726, -19), (1200, -28), (1560, -35.5), (2640, -120)]
    high_db, = in_time(hands)
    busy_db = high_db + 60.5
    cloth_db, room_db = -57.5 + busy_db, -48.5 + 0.24 * busy_db
    rustle = ratio_of_db(high_db) * noise(HISS_SPECTRUM, HOUSING_PEAKS, 3500)
    rustle += ratio_of_db(cloth_db) * noise(HISS_SPECTRUM, (), 670, 3450)
    rustle *= ratio_of_db(2 * drift(27))
    room = ratio_of_db(room_db) * noise(floor_spectrum, (), 260) + ratio_of_db(-49.5) * noise(floor_spectrum, (), 0, 266)
    hum = ratio_of_db(in_time(hum_swells)[0] + 1.2 * drift(2.5)) * np.sin(2 * np.pi * 119.5 * TIME_S)
    return rustle + room + hum


def scene():
    bowl = knocks()
    near = shells() + creaks()
    far = dings() + bumps() + thuds()
    echo = kitchen(ratio_of_db(-12.5) * near + ratio_of_db(-54) * bowl)
    return (bowl + mixer(bowl) + near + far + background() + echo)[None]


def band_limit(x):
    return signal.sosfilt(signal.butter(12, 15800, fs=SR, output="sos"), x)


def record(dry):
    gap_start_s, gap_end_s = .157, .251
    on = 1 - uniform_filter1d(1. * (TIME_S > gap_start_s) * (TIME_S < gap_end_s), size=150)
    cut = signal.sosfilt(signal.butter(2, 48, "high", fs=SR, output="sos"), dry * (on + 1e-4))
    limit = minimum_filter1d(np.minimum(1, .9 / (np.abs(cut) + 1e-9)), size=201)
    limited = cut * uniform_filter1d(limit, size=101)
    mix = signal.sosfilt(signal.cheby2(16, 60, 16380, fs=SR, output="sos"), limited)
    return band_limit(mix)


dry = scene()
out = record(dry)
waveform_to_disk(out)
```